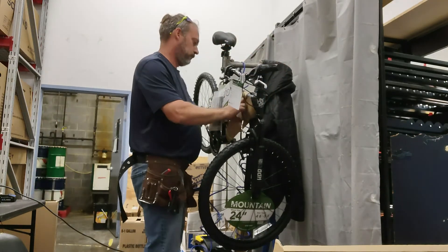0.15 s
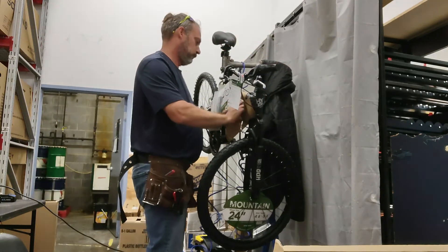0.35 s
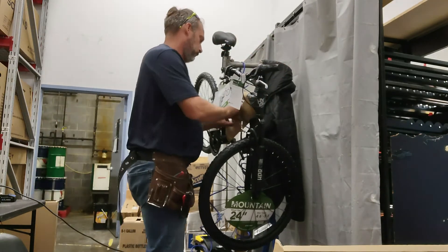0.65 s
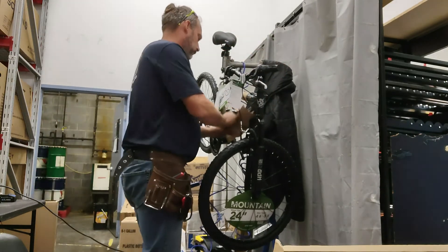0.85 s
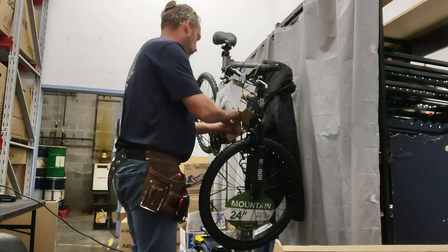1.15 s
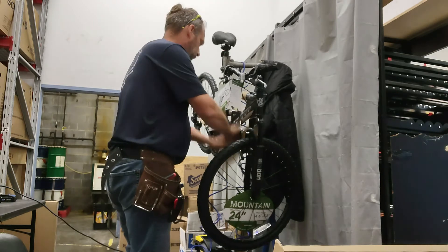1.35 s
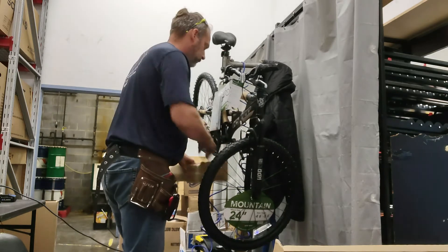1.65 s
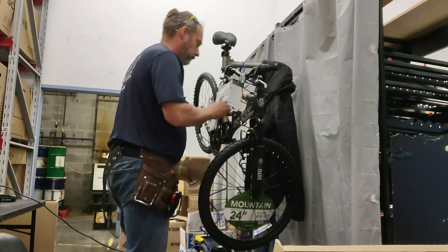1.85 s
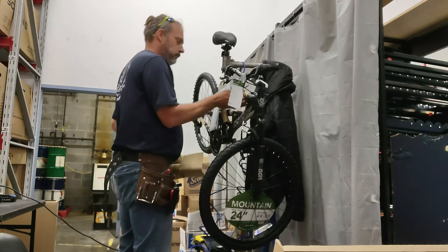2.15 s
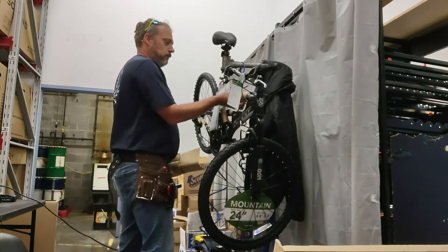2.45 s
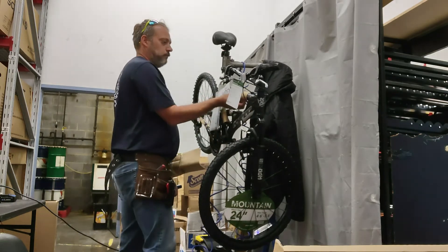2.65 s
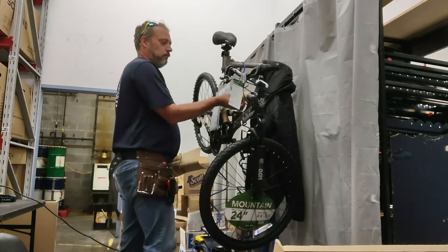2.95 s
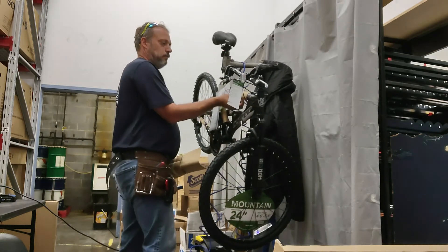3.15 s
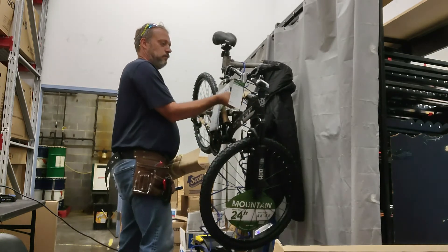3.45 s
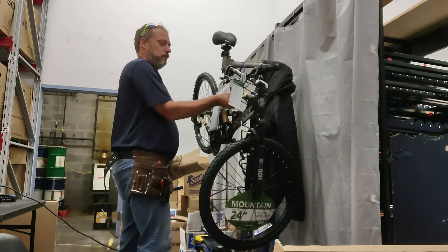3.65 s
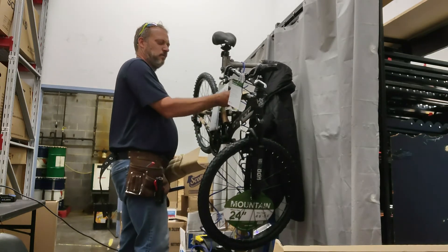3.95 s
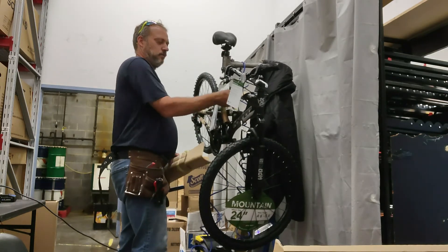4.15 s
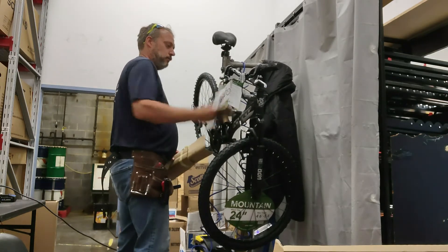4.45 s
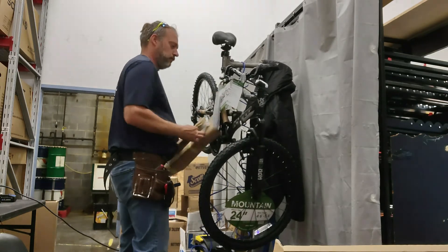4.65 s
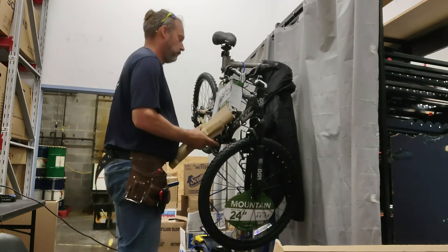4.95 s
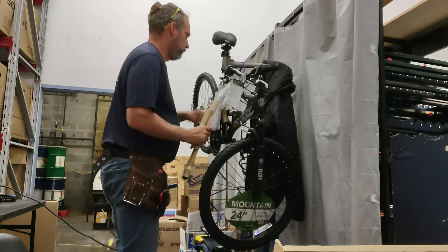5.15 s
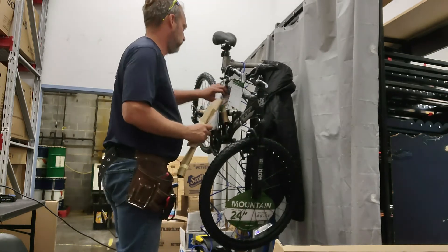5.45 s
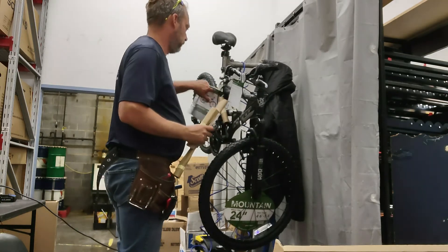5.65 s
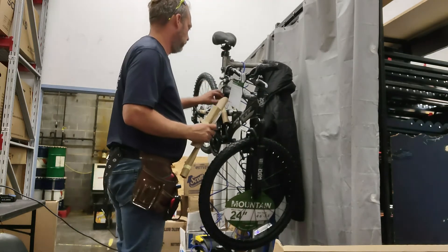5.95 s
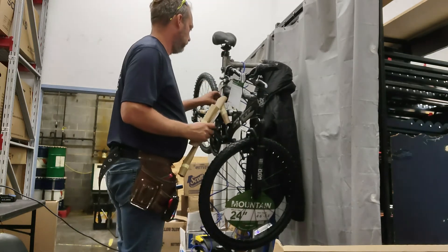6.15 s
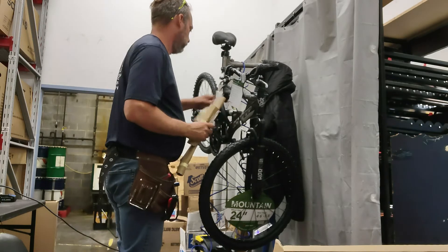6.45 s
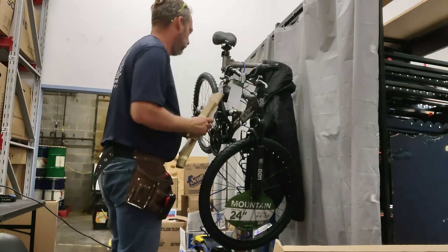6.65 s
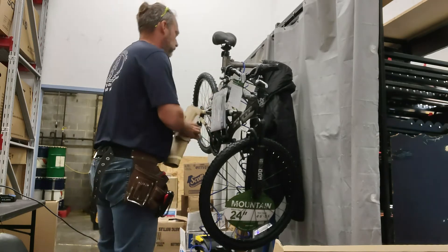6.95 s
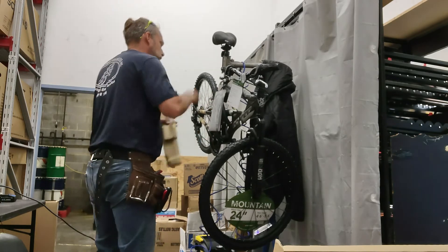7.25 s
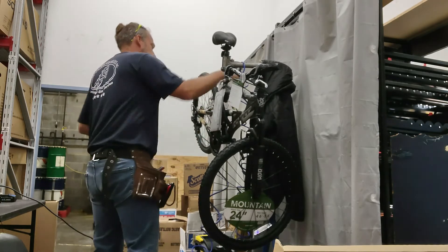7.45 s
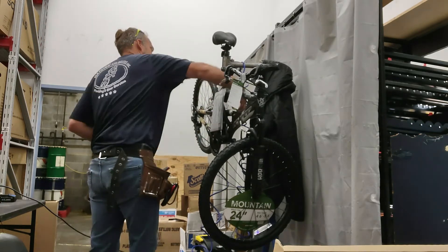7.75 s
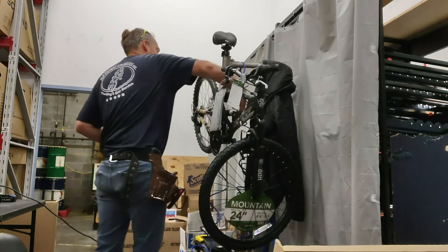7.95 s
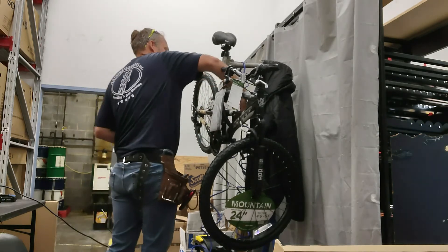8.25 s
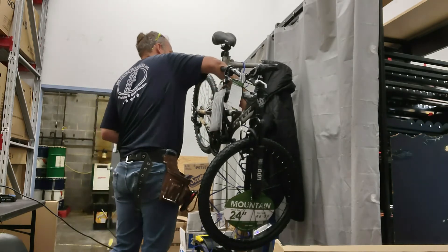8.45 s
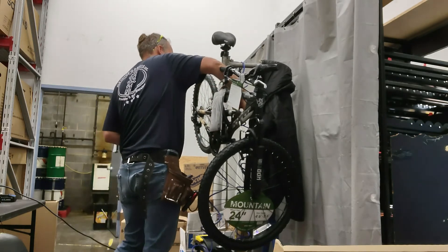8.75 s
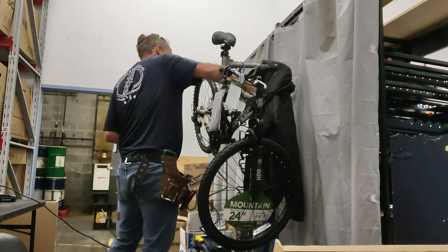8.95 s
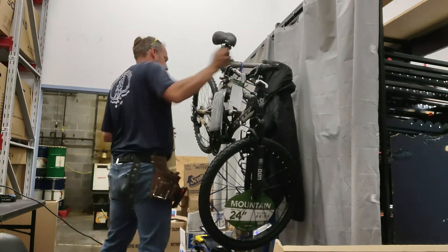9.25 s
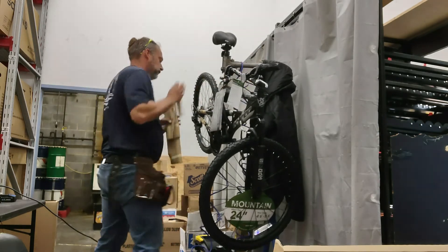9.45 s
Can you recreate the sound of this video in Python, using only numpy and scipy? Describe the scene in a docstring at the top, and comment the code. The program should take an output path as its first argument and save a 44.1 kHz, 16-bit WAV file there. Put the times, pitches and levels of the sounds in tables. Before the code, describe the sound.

In a large echoing storeroom a machine hums and whines constantly while packaging on a bicycle crackles, knocks and snaps loose at irregular moments.

```python
"""Sharp snaps and crackling rustles ring out over a steady machine hum in a large hard-walled storeroom.
Cardboard and ties are pulled off a bicycle: jolts ring cardboard modes, dense grains make the rustles,
and a decaying noise tail draws both out. The machine hums in a comb of shaft orders, with a throbbing
whine between its sidebands, a fine rattle that repeats every turn, broad noise for the air, and narrow
noise for casing resonances and a fuzzy whistle of the shaft."""
import sys
import numpy as np
from scipy import signal
from scipy.fft import rfft, irfft, next_fast_len
from scipy.io import wavfile

SR = 44100
rng = np.random.default_rng(int(sys.argv[2]) if len(sys.argv) > 2 else 0)


def store_wav(level_fs):
    """Save 16-bit WAV to argv[1]."""
    pcm = np.round(np.clip(np.atleast_2d(level_fs), -1, 1) * 32767)
    wavfile.write(sys.argv[1], SR, pcm.T.astype(np.int16))


N = 423801  # samples

TURNS_PER_S = 11.9394  # shaft speed; order k lies at k times this frequency
FIRST_ORDER, RATTLE_ORDER, END_ORDER = 5, 94, 700  # hum starts, rattle takes over, rattle ends before


def gain_of(db):
    """Decibels to amplitude."""
    return 10 ** (np.asarray(db) / 20)


def evened(x):
    """Scales to rms 1."""
    return x / np.sqrt(np.mean(x ** 2) + 1e-20)


def read(points, hz):
    """Reads a table of (f/Hz, value) on a log-frequency axis."""
    f, value = np.transpose(points)
    return np.interp(np.log(hz + 1), np.log(f + 1), value)


def humps(modes, hz):
    """Amplitude of several humps whose powers add; each halves in amplitude across its width."""
    power = 0
    for f, width, db in modes:
        power = power + gain_of(2 * db) / (1 + (2 * (hz - f) / width) ** 2) ** 2
    return np.sqrt(power)


def drift(rate_hz):
    """Slow random wander of rms 1: sines up to rate_hz, the slower ones larger."""
    hz = np.geomspace(rate_hz / 20, rate_hz, num=20)[:, None]
    t = np.arange(0, N + 256, 256) / SR
    sines = np.sin(2 * np.pi * (hz * t + rng.random(hz.shape)))
    slow = (sines / np.sqrt(hz)).sum(0)
    return np.interp(np.arange(N) / SR, t, evened(slow))


def tones(hz, level, phase):
    """Steady sines of given rms, placed on a fine frequency grid."""
    size = next_fast_len(2 * N)
    spectrum = np.zeros(size // 2 + 1, complex)
    bins = np.round(hz * size / SR).astype(int)
    spectrum[bins] = level * np.exp(1j * phase) * size / np.sqrt(2)
    return irfft(spectrum, size)[:N]


def coloured(x, gain):
    """Filters by gain(hz) without delay."""
    return irfft(rfft(x) * gain(np.fft.rfftfreq(len(x), 1 / SR)), len(x))


def add(mix, s, sound):
    """Mixes a sound in at a time in seconds."""
    part = mix[round(s * SR):][:len(sound)]
    part += sound[:len(part)]


# broad air noise: (f/Hz, level/dB per Hz)
AIR_SPECTRUM = [(20, -91), (31, -79), (80, -75.5), (300, -77), (700, -77), (1000, -76.5), (1500, -79),
                (3300, -85.5), (4300, -93.5), (5900, -89.5)]
# casing resonances and, at 1113 Hz, a fuzzy wandering whistle of the shaft, all made of narrow noise:
# (f/Hz, width/Hz, level at the top/dB per Hz)
NARROW_NOISES = [(815, 100, -72.5), (1113, 8, -63.5), (1366, 51, -69), (3752, 235, -81), (5160, 170, -92.5),
                 (6773, 710, -79.5), (7110, 43, -80.5)]


def air_casing_and_whistle():
    """Broad air noise, then narrow noise for casing and shaft whistle, each fluttering on its own."""
    white = rng.standard_normal((2, N)) * np.sqrt(SR / 2)  # power 1 per Hz
    broad = coloured(white[0], lambda hz: gain_of(read(AIR_SPECTRUM, hz)))
    mix = broad * gain_of(0.18 * drift(3.2))
    for band in NARROW_NOISES:
        narrow = coloured(white[1], lambda hz: humps([band], hz))
        mix += narrow * gain_of(2.5 * drift(16))
    return mix


# strong orders of the hum: (order of the shaft speed, rms level/dB)
STRONG_ORDERS = [(7, -53.3), (9, -52.3), (10, -56), (11, -50.6), (12, -54.7), (14, -51.7), (16, -52.2),
                 (17, -51.7), (22, -49.0), (23, -52.7), (25, -55.5), (26, -56.1), (27, -54.9), (28, -54.0),
                 (29, -51.0), (31, -52.1), (36, -55.4), (45, -56.1), (65, -54.8), (67, -56.2), (68, -55.4),
                 (71, -52.5), (72, -51.8)]
# middle line of the fainter orders between them: (f/Hz, rms level/dB)
FAINT_ORDER_LINE = [(60, -70.5), (100, -55), (220, -70), (360, -59), (410, -67.5), (500, -59), (650, -71.5),
                    (770, -59.5), (910, -60), (960, -62.5), (1100, -65.5)]
FAINT_SCATTER_DB = 2  # rms scatter of the faint orders about that line
# faint mains-driven tones: (f/Hz, rms level/dB)
MAINS_TONES = [(59.8, -66), (119.9, -58), (239.8, -59)]
MAIN_ORDER, MAIN_DB, MAIN_WOBBLE_RAD = 20, -39, 0.85  # the loudest order wavers in pitch once a turn


def hum():
    """Strong and faint orders of the shaft, the wavering main order and the mains tones."""
    every = np.arange(FIRST_ORDER, RATTLE_ORDER)
    hz = every * TURNS_PER_S
    db = read(FAINT_ORDER_LINE, hz) + FAINT_SCATTER_DB * rng.standard_normal(len(every))
    order, strong_db = np.transpose(STRONG_ORDERS)
    db[order.astype(int) - FIRST_ORDER] = strong_db
    apart = abs(every - MAIN_ORDER) > 1  # the wobble of the main order makes its own neighbours
    comb = tones(hz, gain_of(db) * apart, 2 * np.pi * rng.random(len(db)))
    comb *= gain_of(.5 * drift(2))

    turns = TURNS_PER_S * np.arange(N) / SR
    wobble = MAIN_WOBBLE_RAD * np.sin(2 * np.pi * (turns + rng.random()))
    main = gain_of(MAIN_DB) * np.sqrt(2) * np.sin(2 * np.pi * MAIN_ORDER * turns + wobble)

    mains_hz, mains_db = np.transpose(MAINS_TONES)
    return comb + main + tones(mains_hz, gain_of(mains_db), 0)


# whine and its sidebands: (orders above the whine, typical rms level/dB)
WHINE_BANDS = [(-1, -60.5), (0, -42), (1, -44), (2, -61), (11, -54)]
WHINE_HZ, WHINE_PEAK_S = 1341.02, .031  # centre pitch; a time when the sidebands line up
WHINE_WANDER_DB, WHINE_SLACK_RAD = .7, .11  # rms wander of each band in level and phase


def whine():
    """Sidebands one order apart beat once a turn; pitch and strength wander a little."""
    t = np.arange(N) / SR
    carrier = 2 * np.pi * WHINE_HZ * t + 1.1 * drift(.3)
    turn = 2 * np.pi * TURNS_PER_S * (t - WHINE_PEAK_S)
    mix = np.zeros(N)
    for k, db in WHINE_BANDS:
        level = gain_of(db + WHINE_WANDER_DB * drift(2.8))
        angle = carrier + round(k) * turn + WHINE_SLACK_RAD * drift(4.0)
        mix += level * np.sqrt(2) * np.sin(angle)
    return mix


# rattle resonances: (f/Hz, width/Hz, typical rms level of one order at the top/dB)
RATTLE_MODES = [(1190, 230, -64), (2120, 1280, -72), (3640, 260, -75), (5036, 370, -70), (6550, 375, -69)]


def rattle():
    """The same small contacts every turn: high orders of random size under the resonances."""
    hz = TURNS_PER_S * np.arange(RATTLE_ORDER, END_ORDER)
    chance, phase = rng.random((2, len(hz)))
    size = np.sqrt(-np.log(1 - chance))  # mean power 1
    pattern = tones(hz, humps(RATTLE_MODES, hz) * size, 2 * np.pi * phase)
    return pattern * gain_of(1.9 * drift(6))


# how long the room rings: (f/Hz, time to fall 60 dB t/s)
ROOM_DECAY = [(300, 1), (1000, 0.6), (2500, 0.67), (5000, 0.58), (8000, 0.48)]


def tail():
    """Dense reflections that build up, then die band by band; energy 1."""
    hz, t, bands = signal.stft(rng.standard_normal(SR), SR, nperseg=256)
    fading = bands * gain_of(-60 * t / read(ROOM_DECAY, hz)[:, None])
    late = signal.istft(fading, SR, nperseg=256)[1]
    late = late * (1 - np.exp(-np.arange(len(late)) / SR / 0.019))
    return late / np.linalg.norm(late)


def rustle(rise_s, tilt_db):
    """Dense crackle that swells as the cardboard is pulled and stops soon after."""
    t = np.arange(-4410, 4410) / SR
    swell = np.where(t < 0, np.exp(t / rise_s), np.exp(-t / 0.014))
    grain_db = 2.2 * np.minimum(rng.exponential(1, len(t)), 4)
    grains = rng.standard_normal(len(t)) * gain_of(grain_db)

    def tilted(hz):
        low_cut = hz ** 2 / (hz ** 2 + 700 ** 2)
        return gain_of(tilt_db * np.log2((hz + 1) / 4000)) * low_cut

    return swell * evened(coloured(grains, tilted))


# three modes of stiff cardboard (middle one first), then two bands of the crack:
# (f/Hz, width/Hz, where the ring dies as exp(-2 pi width t))
CARDBOARD_MODES = [(1800, 390), (1030, 450), (2554, 600), (3970, 1600), (7100, 2100)]
# the worker's body shades the direct treble: (f/Hz, level/dB)
BODY_SHADE = [(2000, -1), (2700, -0.5), (4200, -6), (8000, -3)]
SLIP_S, SLIPS_PER_S, TEARING_S = .003, 4000, 0.012  # slip run length, slip density, tearing decay
BRIGHT_CRACK_DB = 5.5  # the upper crack band lies this far over the lower


def snap(db, pitch, tilt_db, middle_db, crack_db):
    """A tie lets go in one jolt and a quick run of smaller slips; each rings the cardboard.
    Gives the sound towards the microphone and the even sound of equal energy that fills the room."""
    t = np.arange(900) / SR
    chance, size = rng.random(len(t)), rng.standard_normal(len(t))
    slips = .5 * size * (chance < SLIPS_PER_S / SR) * np.exp(-(t / SLIP_S) ** 2)
    slips[0] = 1  # the jolt
    tearing = size * np.exp(-t / TEARING_S)

    octaves = np.log2(np.transpose(CARDBOARD_MODES)[0, :3] / CARDBOARD_MODES[0][0])
    ring_db = db + tilt_db * octaves + middle_db * (octaves == 0)
    mode_db = [*ring_db, crack_db, crack_db + BRIGHT_CRACK_DB]

    near, spread = np.zeros((2, len(t)))
    for k, ((hz, width), peak_db) in enumerate(zip(CARDBOARD_MODES, mode_db)):
        hz = hz * pitch if k < 3 else hz  # each piece has its own size
        sense = 1 if k in (0, 3) else -1  # neighbouring modes swing in opposite senses
        # soft start keeps the skirts steep
        ring = sense * np.sin(2 * np.pi * hz * t) * t ** 2 * np.exp(-2 * np.pi * width * t)
        drive = slips if k < 3 else tearing  # the crack has no single jolt
        rung = np.convolve(drive, ring)[:len(t)]
        rung *= gain_of(peak_db) / abs(rung).max()
        near += gain_of(read(BODY_SHADE, hz)) * rung
        spread += ring * np.linalg.norm(rung) / np.linalg.norm(ring)
    return near, spread


# snaps: (t/s, ring peak level before shading/dB, ring pitch/ratio, tilt/dB per octave,
# middle mode over the tilt/dB, lower crack peak level before shading/dB, room level/dB)
SNAP_EVENTS = [(0.874, -31, 1.1, 6, -0.5, -29, -2), (1.4158, -18.5, 1.12, -3.5, -8.5, -30, -0.5),
               (1.531, -31.5, 1.1, 0, -5, -32, -13), (4.031, -34.5, 0.99, 6, 2, -31, -2),
               (4.402, -37, 1.03, -5, 7, -32, -1.5), (6.522, -19.5, 0.98, -5.5, 6, -27, -1.5),
               (8.609, -36, 1.15, -1, 10.5, -43, -10), (8.931, -35.5, 1.08, -3, 9, -40, -8),
               (8.978, -12.5, 1.01, 1.5, 4, -23, -4)]
# rustles: (t of the peak/s, rms level at the peak of the swell/dB, rise/s, tilt/dB per octave)
RUSTLE_EVENTS = [(0.099, -39.5, 0.021, 0), (0.8508, -36, 0.019, 10), (0.9664, -31, 0.033, 11),
                 (1.4489, -40, 0.037, 4), (1.4892, -29.5, 0.019, 6), (2.8467, -39, 0.018, 2.5),
                 (3.518, -31, 0.038, 3.5), (4.4011, -22.5, 0.018, 8.5), (4.9195, -41.5, 0.024, -3.5),
                 (6.9003, -40, 0.048, 3.5), (7.2174, -30, 0.03, 9.5)]
# first reflections of a snap: (delay t/s, level/dB)
FIRST_ECHOES = [(.004, -13), (.0105, -10), (.018, -18), (.04, -15)]


def handling():
    """Snaps with first reflections, and rustles, each drawn out by a room tail of its own."""
    mix = np.zeros(N)
    for s, *strength, room_db in SNAP_EVENTS:
        near, spread = snap(*strength)
        add(mix, s, near)
        for delay_s, echo_db in FIRST_ECHOES:
            add(mix, s + delay_s, gain_of(echo_db) * near)
        add(mix, s, gain_of(room_db) * signal.fftconvolve(spread, tail()))
    for s, db, rise_s, tilt_db in RUSTLE_EVENTS:
        sound = gain_of(db) * rustle(rise_s, tilt_db)
        start = max(round(s * SR) - len(sound) // 2, 0) / SR  # the swell peaks mid-sound
        add(mix, start, sound)
        add(mix, start, gain_of(1.5) * signal.fftconvolve(sound, tail()))
    return mix


def scene():
    """Machine and handling, one channel."""
    machine = air_casing_and_whistle() + hum() + whine() + rattle()
    return (machine + handling())[None]


# microphone treble roll-off: (f/Hz, level/dB)
MICROPHONE_ROLLOFF = [(7600, 0), (7900, -7.5), (8250, -19), (8450, -26)]
EDGE_HZ = 8500  # band limit


def record(dry):
    """Treble roll-off of the microphone, then the band limit."""
    heard = coloured(dry[0], lambda hz: gain_of(read(MICROPHONE_ROLLOFF, hz)))[None]
    low_pass = signal.firwin(1023, EDGE_HZ, window=("kaiser", 10), fs=SR)
    return signal.oaconvolve(heard, low_pass[None], "same")


dry = scene()
out = record(dry)
store_wav(out)
```